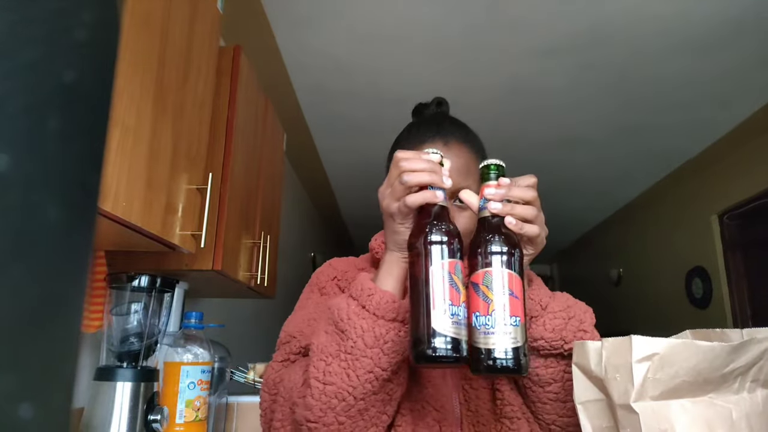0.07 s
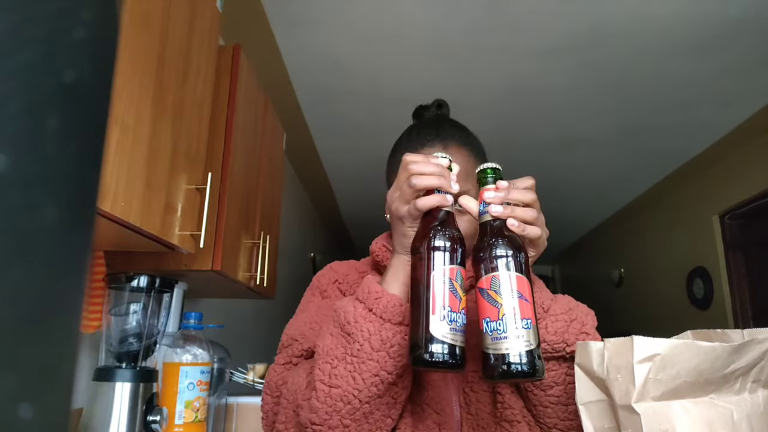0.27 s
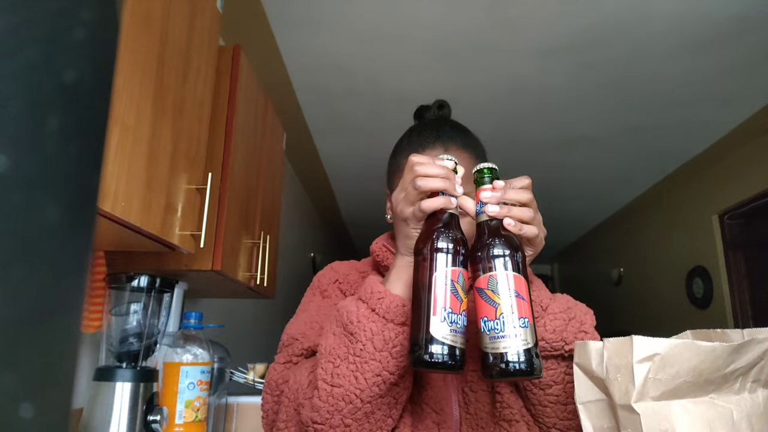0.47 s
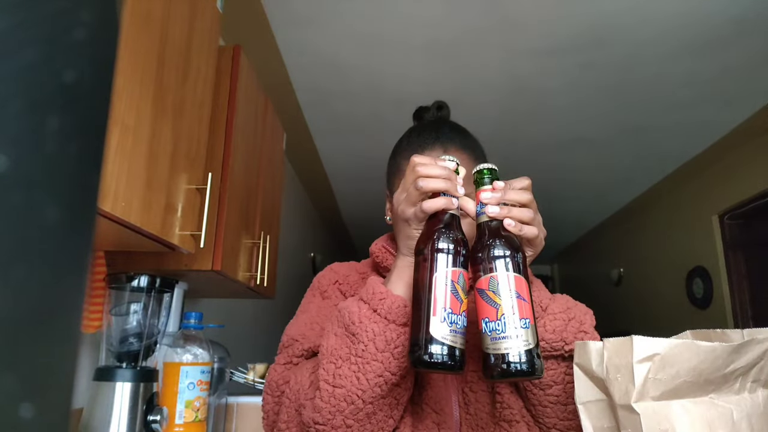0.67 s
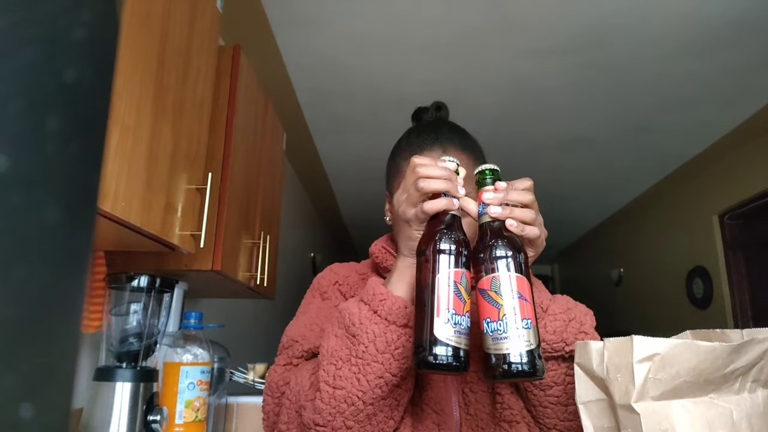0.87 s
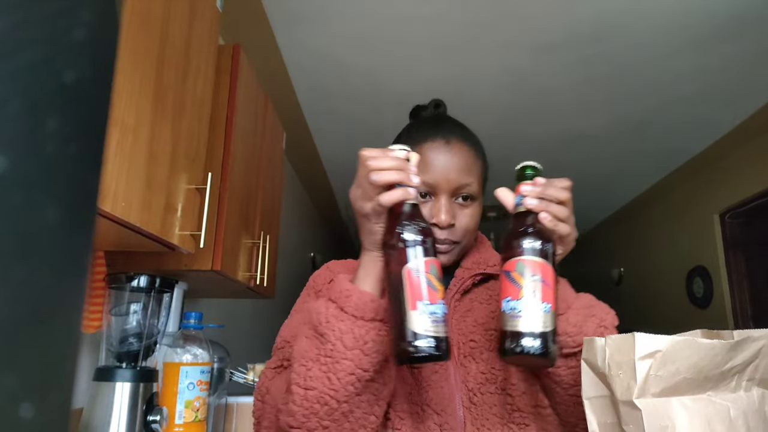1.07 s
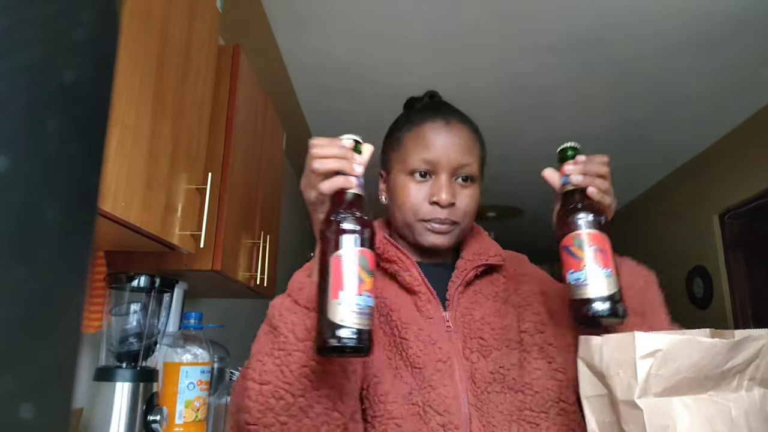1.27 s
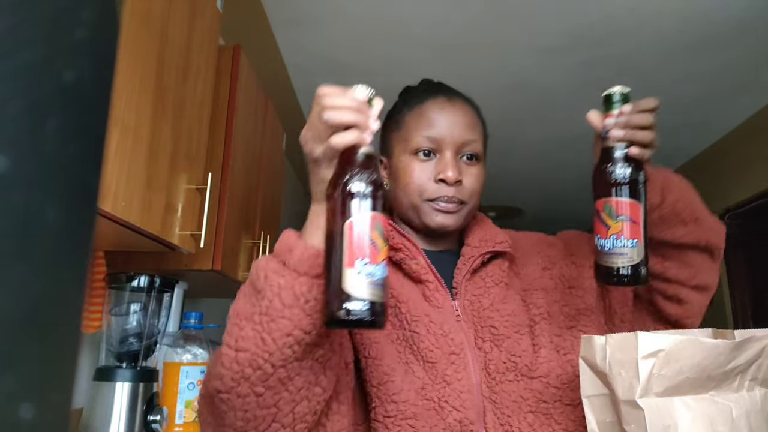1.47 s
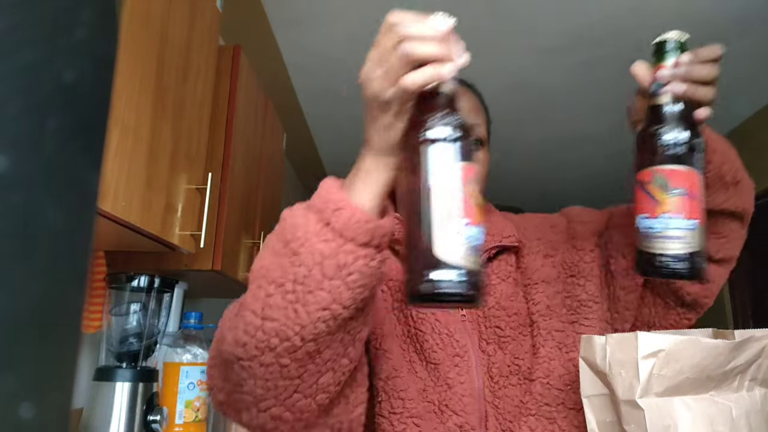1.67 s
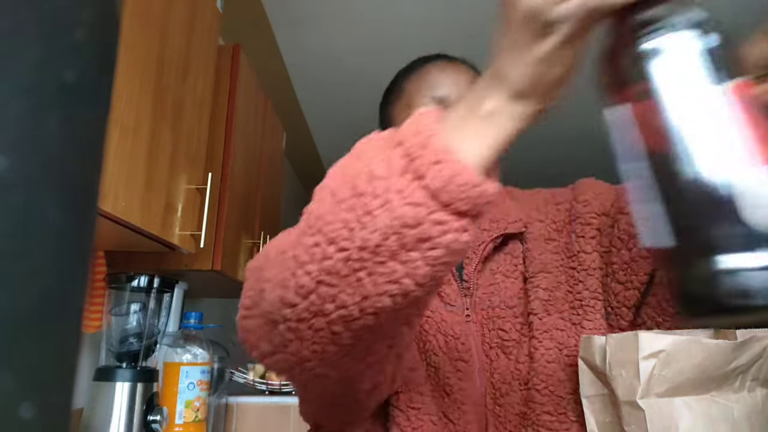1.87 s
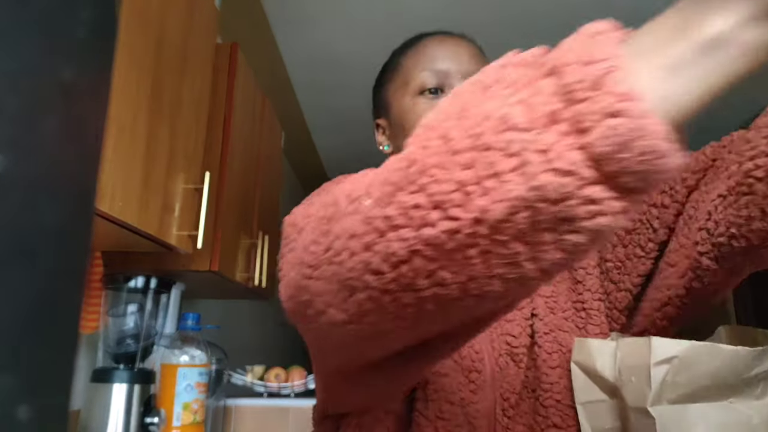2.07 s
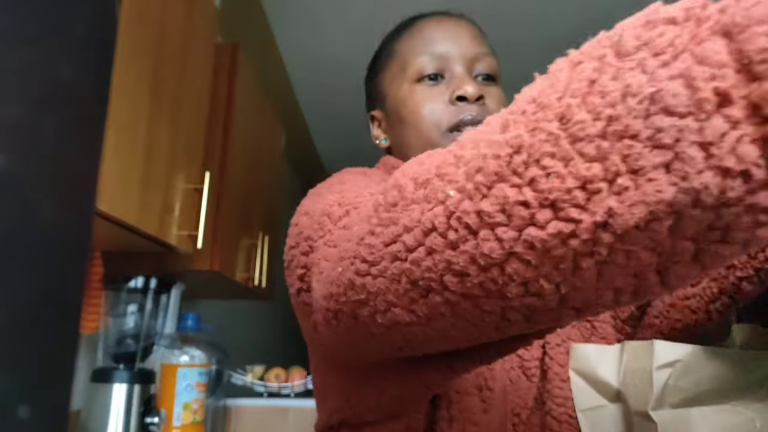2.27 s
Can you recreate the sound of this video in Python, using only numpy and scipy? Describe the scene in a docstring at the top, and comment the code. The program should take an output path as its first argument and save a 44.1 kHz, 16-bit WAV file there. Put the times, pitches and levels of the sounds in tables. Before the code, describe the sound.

Two glass bottles clink together three times, followed by soft sleeve rustling.

```python
"""A brief rustle, then three ringing glass clinks and one faint graze in a quiet kitchen.
Two full bottles, held by the necks, strike together; their nearly equal wall modes beat.
Fleece sleeves rub and hands bump and scuff as the bottles are pulled apart and swung past
the microphone. Room air and a low wavering hum lie underneath."""
import sys
import numpy as np
from scipy import signal
from scipy.fft import rfft, irfft, next_fast_len
from scipy.io import wavfile
from scipy.ndimage import map_coordinates

SR = 44100
rng = np.random.default_rng(int(sys.argv[2]) if len(sys.argv) > 2 else 0)


def store_pcm(level_fs):
    """Save levels as 16-bit WAV."""
    pcm = np.round(np.clip(level_fs, -1, 1) * 32767).astype(np.int16)
    wavfile.write(sys.argv[1], SR, np.atleast_2d(pcm).T)


N = 105840

# wall modes of both bottles: pitch_hz, t60_s, left_over_right_db, flank_db, heel_db, belly_db
WALL_MODES = [ (1675, .55, -2, -37, -42, -39), (2412, .75, -9, -20, -52, -40),
              (2473.3, .82, 2, -23, -39, -12), (2503.7, .75, 1, -15.5, -42, -24),
              (2530.6, .56, 8, -16.5, -28, -16), (3615, .2, -3, -20, -32, -20),
              (3702, .21, -8, -9, -19, -12), (4594, .23, -3, -28, -25, -34), (4655, .23, -1, -30, -29, -30),
              (4714, .23, -8, -31, -18, -28), (5623, .25, 11, -42, -24, -31), (5697, .23, 9, -27, -30, -33),
              (5765, .25, 10, -27, -36, -31), (5886, .29, 7, -36, -47, -37), (6334, .21, 7, -31, -44, -30),
              (6444, .21, 12, -31, -47, -38), (6922, .2, 15, -35, -54, -37), (7175, .22, 9, -46, -39, -43),
              (9602, .23, 16, -48, -52, -50), (9781, .22, 15, -48, -54, -50),
              (10150, .23, 9, -59, -56, -55), (11590, .21, 9, -57, -50, -55),
              (11780, .24, 7, -57, -56, -56), (14400, .21, 1, -60, -60, -60)]
# contact places, in the order of the mode level columns
PLACES = ["flank", "heel", "belly"]
# glass contacts: start_s, ring_db, crack_db, crack_hz, knock_db, tick_db, place
CLINKS = [(0.2104, 1.5, 3.5, 3280, -31.5, -24, "flank"), (0.5113, -1.5, -2, 4700, -28, -43, "heel"),
          (0.984, -34.5, -53, 4600, -76.5, -82, "heel"), (1.0923, -1, 3, 2930, -31.5, -56.5, "belly")]
# hard crack of glass on glass: freq_hz, relative_db
CRACK_SPECTRUM = [(500, -30.5), (1200, -15.5), (1900, -0.5), (2800, -1.5), (3200, -3), (3650, 9),
                  (4150, -16.5), (4700, -4.5), (5200, -14.5), (6500, -10), (7300, -20), (8000, -54),
                  (9100, -53), (9800, -31.5), (10800, -49), (15000, -58)]
# dull knock of the filled bottles: freq_hz, relative_db
KNOCK_SPECTRUM = [(150, -31.5), (450, -4.5), (1100, 11.5), (1700, -2), (3000, -17), (7000, -47.5)]
# sleeve strokes: peak_s, level_db, rise_s, fall_s
SLEEVE_STROKES = [(.004, -33.5, .02, 0.054), (1.26, -46, 0.036, 0.081), (1.368, -36.5, 0.028, 0.022),
                  (1.65, -55, 0.25, 1), (2.11, -42.5, .03, 0.062), (2.188, -40, 0.031, 0.053),
                  (2.39, -45, 0.028, .05)]
# rubbing fleece: freq_hz, relative_db
FLEECE_SPECTRUM = [(80, -19), (200, -1), (400, -6), (750, -3.5), (1400, -14), (2100, -12), (3200, -17),
                   (4300, -15), (6200, -25), (8000, -46.5), (11000, -38), (15000, -48.5)]
# soft arm and hand bumps: start_s, level_db
HAND_BUMPS = [(.002, -29.5), (1.061, -34), (1.36, -31), (1.39, -31), (2.1, -29.5), (2.164, -25),
              (2.2, -31.5), (2.255, -31.5), (2.318, -28), (2.38, -30.5)]
# bump colour: freq_hz, relative_db
BUMP_SPECTRUM = [(80, -16.5), (200, -3.5), (290, 3), (420, -9), (560, -11), (720, -2.5), (860, -20.5),
                 (1200, -16.5), (2200, -23), (6000, -43), (9000, -68)]
# dry grip scuffs: start_s, level_db
GRIP_SCUFFS = [(.023, -36.5), (.065, -48), (1.361, -36.5), (1.392, -44), (2.073, -27.5), (2.087, -35),
               (2.111, -34), (2.376, -37)]
# scuff colour: freq_hz, relative_db
SCUFF_SPECTRUM = [(200, -12.5), (650, -13), (950, 3), (1400, -10), (2050, 3.5), (3300, -12), (4100, -0.5),
                  (6000, -25), (8000, -46), (15000, -56.5)]
# kitchen decay: freq_hz, t60_s
ROOM_DECAY = [(200, 0.13), (1500, 0.32), (3000, 0.27), (6000, 0.24), (12000, 0.33)]
# hum bands: centre_hz, width_hz, level_db
HUM_BANDS = [(57, 16, -60), (97, 18, -52)]
# hum swell: time_s, gain_db
HUM_SWELL = [(0, -3.5), (1.3, -5), (1.55, 5), (1.92, 5), (2.01, 15.5), (2.06, 7), (2.24, 15.5), (2.4, 6)]
# room air: freq_hz, relative_db
AIR_SPECTRUM = [(25, -9.5), (45, 4.5), (125, -6), (200, -7.5), (330, 2.5), (520, -5), (900, -17),
                (2100, -19.5), (3200, -31), (4100, -26.5), (6200, -41), (8000, -57), (15000, -69.5)]
# left-right likeness of noise: freq_hz, correlation
STEREO_CORRELATION = [(50, .45), (300, .3), (1500, 0.56), (8000, .1)]

RING_ATTACK_S, CONTACT_DAMP_DB, STEREO_PHASE_RAD = 0.014, -15.5, 0.6
SWAY_KNOTS_PER_S, SWAY_DB, SWAY_RAD = 20, 2.15, 0.15  # at 3 kHz
CRACK_NOISE_DB, AIR_DB = -17, -47.5
RING_ROOM_DB, IMPACT_ROOM_DB, HANDS_ROOM_DB = -12, -4.5, -4.5


def bottles():
    """Each contact damps the old ring and excites a new one, with a tick, a crack and a knock."""
    rings, direct, diffuse = np.zeros((3, 2, N))
    grit, thud = shaped_noise(CRACK_SPECTRUM), shaped_noise(KNOCK_SPECTRUM)
    white = rng.standard_normal((2, N))
    for start_s, ring_db, crack_db, crack_hz, knock_db, tick_db, place in CLINKS:
        t = since(start_s)
        rings *= amp(CONTACT_DAMP_DB * (1 - np.exp(-t / 0.0023)))
        rings += amp(ring_db) * wall_ring(t, place)
        crack = struck(t, attack_s=0.00033, t60_s=0.005) * np.sin(2 * np.pi * crack_hz * t)
        direct += amp(crack_db) * crack
        direct += amp(tick_db) * struck(t, attack_s=0.0001, t60_s=0.009) * white
        diffuse += amp(crack_db + CRACK_NOISE_DB) * struck(t, attack_s=0.0006, t60_s=0.05) * grit
        diffuse += amp(knock_db) * struck(t, attack_s=0.00089, t60_s=0.054) * thud
    reverb = amp(RING_ROOM_DB) * kitchen(rings) + amp(IMPACT_ROOM_DB) * kitchen(diffuse)
    return rings + direct + diffuse + reverb


def wall_ring(t, place):
    """Contact place sets each mode's level; modes waver as the bottles move, high ones more."""
    ring = np.zeros((2, N))
    for hz, t60_s, pan_db, *levels_db in WALL_MODES:
        live = (t > 0) & (t < 1.5 * t60_s)
        age_s = t[live]
        pan = unit_rms(amp([[pan_db / 2], [-pan_db / 2]]))
        attack_s = RING_ATTACK_S * min(2500 / hz, 1) ** 8  # far shorter above 2.5 kHz
        pitch_ratio = hz / 3000
        knots = rng.standard_normal((4, 128))
        position = age_s * SWAY_KNOTS_PER_S * pitch_ratio
        sway = np.sqrt(pitch_ratio) * np.array([np.interp(position, np.arange(128), k) for k in knots])
        phase = rng.uniform(0, 2 * np.pi) + np.array([[1], [-1]]) * STEREO_PHASE_RAD
        tone = np.sin(2 * np.pi * hz * age_s + phase + SWAY_RAD * sway[2:])
        gain = amp(levels_db[PLACES.index(place)] + SWAY_DB * sway[:2])
        ring[:, live] += gain * pan * struck(age_s, attack_s, t60_s) * tone
    return ring


def sleeves():
    """Fleece rubs in grainy strokes that swell and die away."""
    t = np.arange(N) / SR
    envelope = sum(amp(db) * np.exp(np.minimum((t - peak_s) / rise_s, (peak_s - t) / fall_s))
                   for peak_s, db, rise_s, fall_s in SLEEVE_STROKES)
    return envelope * grainy_noise(FLEECE_SPECTRUM, grain_db=2.5, knots_per_s=220)


def hand_touches(events, spectrum, attack_s, t60_s, grain_db):
    """Short unpitched contacts sharing one colour and decay."""
    envelope = sum(amp(db) * struck(since(start_s), attack_s, t60_s) for start_s, db in events)
    return envelope * grainy_noise(spectrum, grain_db, knots_per_s=400)


def kitchen(dry, delay_s=0.004):
    """Room reflections: a noise tail per channel, each band with its own decay."""
    hz, t, bands = signal.stft(rng.standard_normal((2, SR // 2)), SR, nperseg=256)
    tail = signal.istft(bands * decay(t, log_interp(ROOM_DECAY, hz)[:, None]), SR, nperseg=256)[1]
    tail *= np.arange(tail.shape[1]) > delay_s * SR
    return signal.fftconvolve(dry, tail / np.linalg.norm(tail[0]), axes=1)[:, :N]


def hum():
    """Two narrow low noise bands that waver and swell late."""
    bands = sum(amp(db) * stereo_noise(lambda hz: np.exp(-2 * ((hz - centre_hz) / width_hz) ** 2))
                for centre_hz, width_hz, db in HUM_BANDS)
    swell_db = np.interp(np.arange(N) / SR, *np.transpose(HUM_SWELL))
    return amp(swell_db) * bands


def room_air():
    """Faint, steady, dark noise."""
    return amp(AIR_DB) * shaped_noise(AIR_SPECTRUM)


def grainy_noise(spectrum, grain_db, knots_per_s):
    """Shaped noise with a smooth random level flutter, rms 1."""
    noise = shaped_noise(spectrum)
    flutter = map_coordinates(rng.standard_normal(4096), [np.arange(N) * knots_per_s / SR], mode="wrap")
    return unit_rms(noise * amp(grain_db * flutter))


def shaped_noise(spectrum):
    """Stereo noise from (freq_hz, relative_db) points, rms 1."""
    return stereo_noise(lambda hz: amp(log_interp(spectrum, hz)))


def stereo_noise(gain):
    """Partly correlated noise coloured by gain(hz), rms 1."""
    def mid_side_gain(hz):
        angle = np.arccos(np.clip(log_interp(STEREO_CORRELATION, hz), -1, 1)) / 2
        return gain(hz) * np.array([np.cos(angle), np.sin(angle)])
    mid, side = filtered(rng.standard_normal((2, N)), mid_side_gain)
    return unit_rms(np.array([mid + side, mid - side]))


def filtered(x, gain):
    """Zero-phase filter by gain(hz)."""
    size = next_fast_len(N + SR // 4)
    return irfft(rfft(x, size) * gain(np.fft.rfftfreq(size, 1 / SR)), size)[..., :N]


def struck(t, attack_s, t60_s):
    """Quick rise, then decay."""
    return (1 - np.exp(-t / attack_s)) * decay(t, t60_s)


def decay(t, t60_s):
    return amp(-60 * t / t60_s)


def since(start_s):
    """Elapsed seconds, zero before the start."""
    return np.maximum(np.arange(N) / SR - start_s, 0)


def log_interp(points, hz):
    """Interpolate (freq_hz, value) points on a log frequency axis."""
    freqs_hz, values = np.transpose(points)
    return np.interp(np.log(hz + 1), np.log(freqs_hz + 1), values)


def unit_rms(x):
    return x / np.sqrt(np.mean(x ** 2) + 1e-20)


def amp(db):
    return 10 ** (np.asarray(db) / 20)


def scene():
    """Bottles and handling in the kitchen, over hum and air."""
    hands = sleeves()
    hands += hand_touches(HAND_BUMPS, BUMP_SPECTRUM, attack_s=0.0022, t60_s=0.1, grain_db=2.5)
    hands += hand_touches(GRIP_SCUFFS, SCUFF_SPECTRUM, attack_s=0.0006, t60_s=0.07, grain_db=3.0)
    return bottles() + hands + amp(HANDS_ROOM_DB) * kitchen(hands) + hum() + room_air()


def record(dry):
    """Soft-clip the peaks, then cut above 16.2 kHz."""
    clipped = dry / (1 + np.abs(dry) ** 6) ** (1 / 6)
    return filtered(clipped, lambda hz: hz < 16200)


dry = scene()
out = record(dry)
store_pcm(out)
```